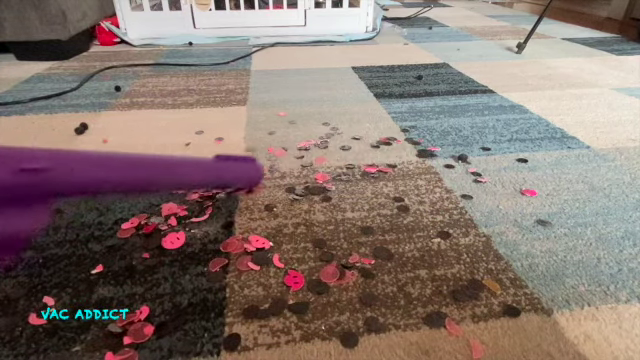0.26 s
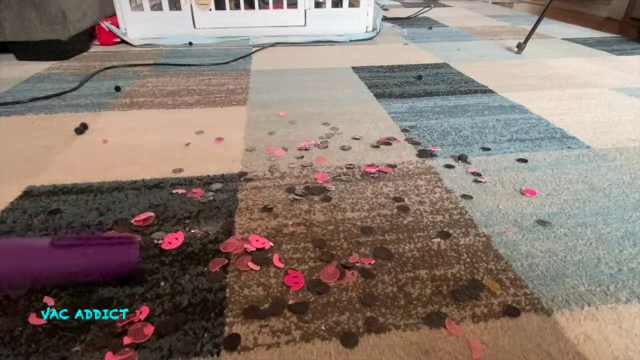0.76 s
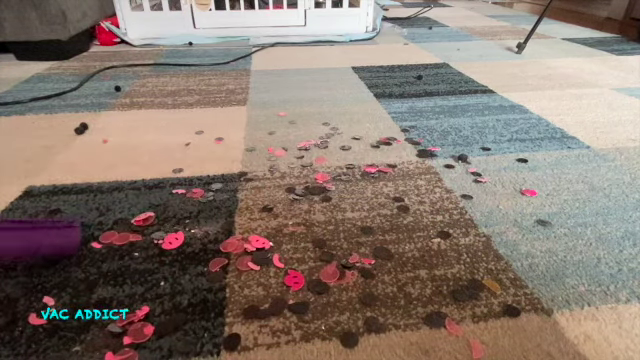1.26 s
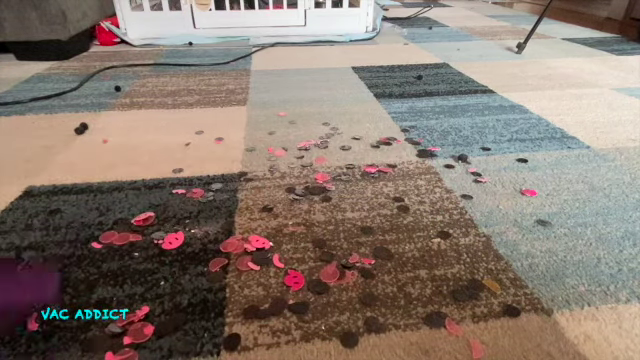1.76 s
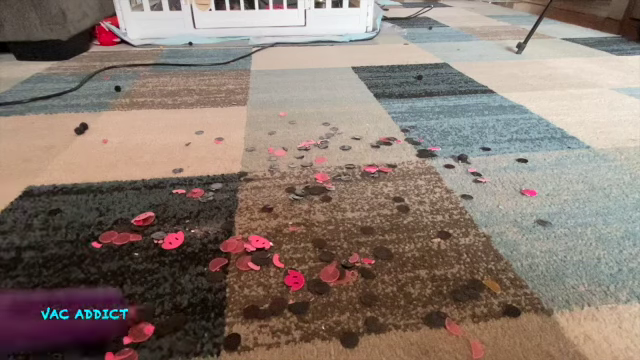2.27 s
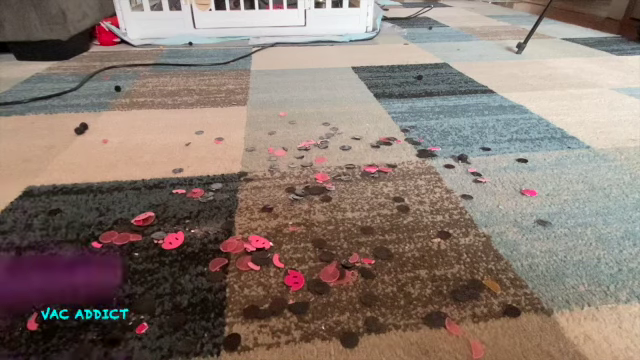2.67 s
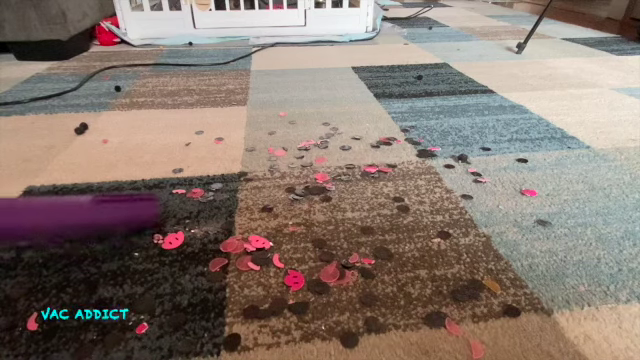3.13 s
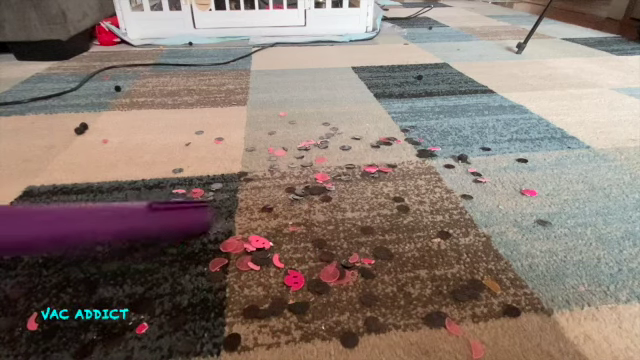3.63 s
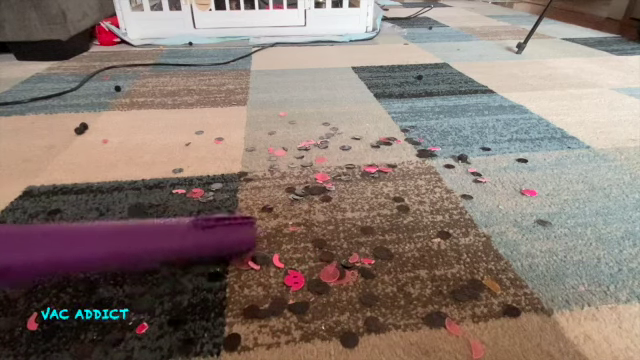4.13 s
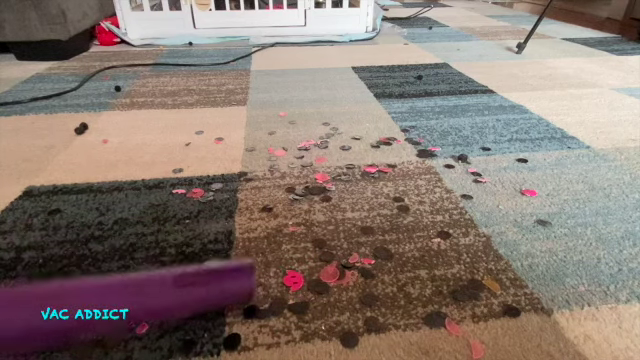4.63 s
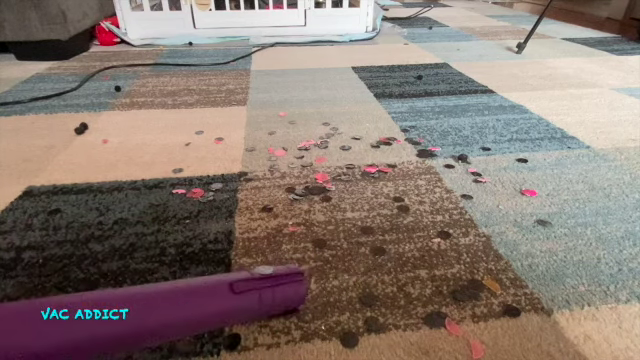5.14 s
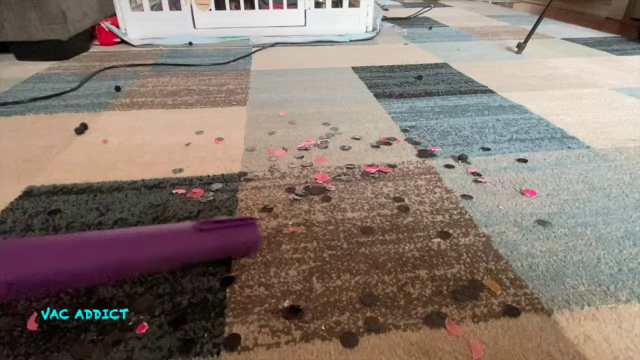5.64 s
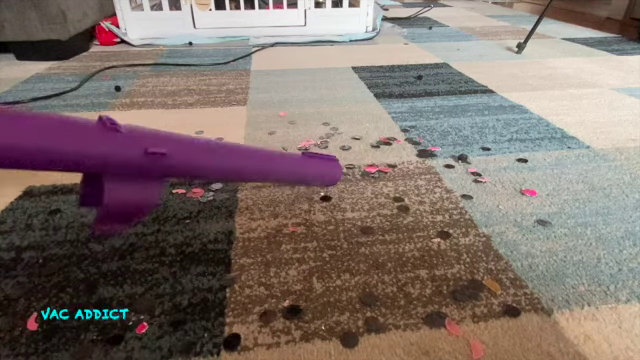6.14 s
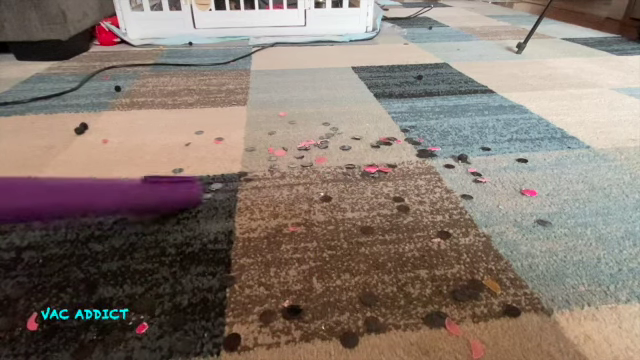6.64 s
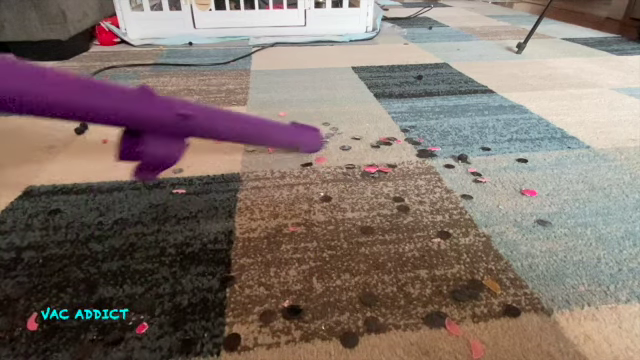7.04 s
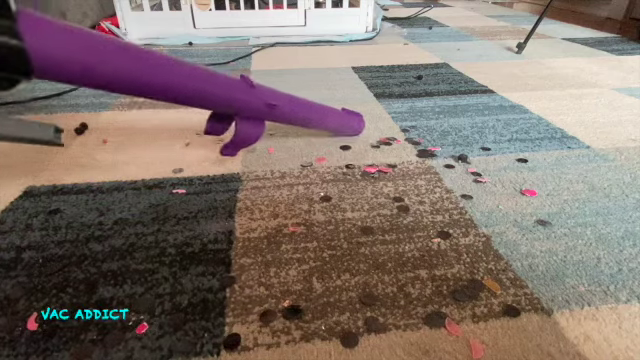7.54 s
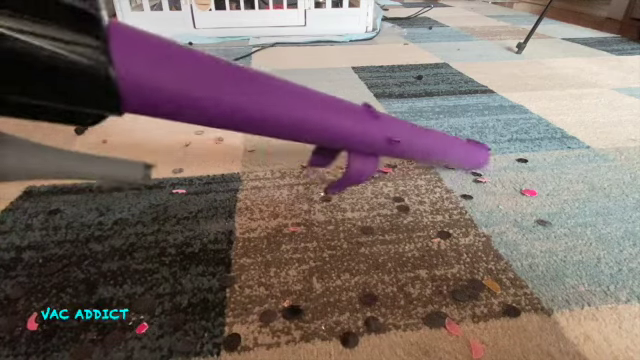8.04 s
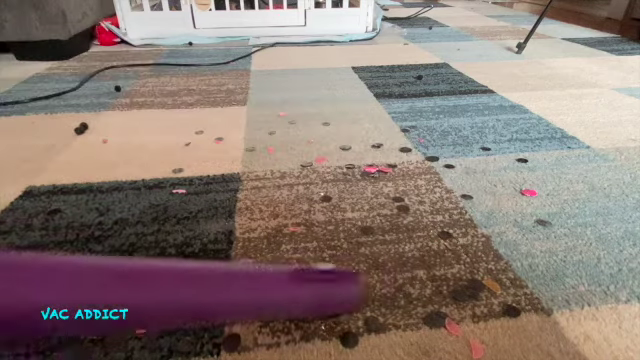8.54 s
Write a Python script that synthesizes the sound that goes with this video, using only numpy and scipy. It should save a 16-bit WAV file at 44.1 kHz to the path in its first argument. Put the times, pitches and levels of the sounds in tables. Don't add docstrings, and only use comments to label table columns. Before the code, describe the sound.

A vacuum cleaner whines and rushes steadily while small hard bits click and rattle up its plastic tube, with brief hisses and whistles at the nozzle.

```python
import sys
import numpy as np
from scipy import signal
from scipy.fft import rfft, irfft, next_fast_len
from scipy.io import wavfile
from scipy.ndimage import uniform_filter1d, map_coordinates

SR = 44100
rng = np.random.default_rng(int(sys.argv[2]) if len(sys.argv) > 2 else 0)


def voltage_ratio(level):
    return 10 ** (np.asarray(level, float) / 20)


def pcm_store(signal):
    levels = np.round(np.clip(np.atleast_2d(signal), -1, 1) * 32767)
    wavfile.write(sys.argv[1], SR, levels.astype(np.int16).T)


N = 388080
T = np.arange(N) / SR

# time in seconds, rotation rate in Hz, whine level in dB.
SHAFT_COURSE = [(0.0, 515, -29), (0.02, 511, -27.5), (1.39, 512.3, -27.5), (1.64, 513.7, -28),
                (3.55, 512.4, -25.5), (5.02, 515.3, -25.5), (5.86, 513.1, -24.5), (8.7, 513.6, -26),
                (8.8, 524, -24)]
# frequency in Hz, density in dB per Hz.
TUBE_SPECTRUM = [(500, 4.5), (1200, 0), (2400, 3), (3600, 1.5), (5200, 2.5), (6200, -3), (7600, 2.5),
                 (8600, -2), (12000, -9.5)]
# frequency in Hz, density in dB per Hz.
SLIT_SPECTRUM = [(6500, -30), (8000, -14), (8700, -13), (9400, -12), (10200, -6), (10900, 1), (11300, 1),
                 (11800, -4), (12500, -10)]


def unit(x):
    return x / np.sqrt(np.mean(x ** 2) + 1e-20)


def loudest(x):
    power = uniform_filter1d(x ** 2, size=44)
    return x / np.sqrt(np.abs(power).max(-1, keepdims=True))


def along(points, hz):
    f, v = np.transpose(points)
    return np.interp(np.log(hz + 1), np.log(f + 1), v)


def curves(rows):
    s, *columns = np.transpose(rows)
    return [np.interp(T, s, column) for column in columns]


def wobble(rate):
    t = T[::44]
    knots = rng.standard_normal(int(N * rate / SR) + 4)
    return np.interp(T, t, map_coordinates(knots, [t * rate]))


def swells(rows, rise_s, fall_s, rest_db):
    t = T[::44]
    level = np.full(len(t), float(rest_db))
    for s, hold, db in rows:
        end = s + abs(hold)
        share = np.interp(t, [s - abs(rise_s), s, end, end + abs(fall_s)], [0, 1, 1, 0])
        level = np.maximum(level, rest_db + share * (db - rest_db))
    return np.interp(T, t, level)


def filtered(x, response):
    m = next_fast_len(N + SR // 2)
    return irfft(rfft(x, m) * response(np.fft.rfftfreq(m, 1 / SR)), m)[..., :N]


def noise(spectrum, patchy_db):
    z = signal.stft(rng.standard_normal((2, N)), nperseg=512)[2]
    field = uniform_filter1d(rng.standard_normal(z.shape[1:]), 6, 0)
    field = uniform_filter1d(field, 10, 1)
    pair = signal.istft(z * voltage_ratio(patchy_db * unit(field)), nperseg=512)[1][:, :N]
    return unit(filtered(pair, lambda hz: voltage_ratio(along(spectrum, hz))))


def tones(turns, orders, flutter_db):
    out = np.zeros((2, N))
    for k, left_db, right_db, lead in orders:
        angle = 2 * np.pi * (k * turns + rng.random()) + np.array([[lead], [0]])
        level_db = np.array([[left_db], [right_db]]) + 2.5 + flutter_db * wobble(9)
        out += voltage_ratio(level_db) * np.sin(angle)
    return out


def motor():
    # multiple of the rotation rate, left level in dB, right level in dB, left lead in radians.
    shaft_orders = [(1, -22.5, -22, 1.9), (2, -46, -46, -3.1), (3, -53, -52, -2.7), (5, -52, -59, .8),
                    (6, -57, -58, 2.7), (9, -55, -59, -.4), (12, -51, -54, -2.8)]
    # multiple of twice the mains rate, left level in dB, right level in dB, left lead in radians.
    mains_orders = [(1, -45, -47, .2), (2, -35, -30, 1), (4, -42, -54, 1.1), (6, -42, -47, 2.4),
                    (7, -42, -44, 2.7), (8, -41, -43, 2.9), (9, -43, -45, 3), (10, -50, -63, 2.9),
                    (13, -58, -59, -1.6), (15, -53, -61, -2.3), (18, -59, -69, -.2)]
    hz, db = curves(SHAFT_COURSE)
    turns = np.cumsum(hz + 0.57 * wobble(14)) / SR
    whine = voltage_ratio(db - np.mean(db)) * tones(turns, shaft_orders, flutter_db=0.16)
    buzz_hz = 120.33
    return whine + tones(buzz_hz * T, mains_orders, flutter_db=1.0)


def air():
    # frequency in Hz, density in dB per Hz.
    rush_spectrum = [(25, -37), (70, -3.5), (130, -7.5), (330, -1), (620, 3), (800, 2.6), (1100, -0.1),
                     (1400, -8), (2400, -10), (4500, -12), (5600, -15.5), (7500, -21), (8600, -30),
                     (11000, -33)]
    drift_db = 0.4 * wobble(1.3) + 0.3 * wobble(8)
    rush = noise(rush_spectrum, patchy_db=1.8)
    near_db = curves(SHAFT_COURSE)[1]
    return voltage_ratio(-28.5 + drift_db + 0.51 * (near_db - near_db.mean())) * rush


def grit(rate, spread_db, t60):
    sizes = voltage_ratio(spread_db * np.minimum(rng.exponential(size=N), 2.2))
    knocks = (rng.random(N) < rate / SR) * sizes
    return unit(signal.fftconvolve(knocks, voltage_ratio(-60 * T[:SR // 20] / t60))[:N])


def edge_tone():
    # time in seconds, pitch in Hz.
    glide = [(0.1, 10900), (2.33, 10920), (2.48, 11500), (3.0, 10300), (3.05, 10300), (3.09, 10860),
             (3.97, 10700), (4.07, 11200), (4.23, 11200), (4.33, 11200), (4.83, 10650), (4.91, 11180),
             (5.94, 10660), (6.05, 10900), (6.94, 11000), (7.0, 10600), (7.66, 10900), (7.76, 11000)]
    width_hz, stutter_db = 330, 11
    angle = 2 * np.pi * np.cumsum(curves(glide)[0]) / SR
    pair = []
    for _ in range(2):
        pair.append(wobble(width_hz) * np.cos(angle) + wobble(width_hz) * np.sin(angle))
    return unit(voltage_ratio(stutter_db * wobble(70)) * np.array(pair))


def nozzle():
    # frequency in Hz, density in dB per Hz.
    drag_spectrum = [(25, -55), (60, -3.5), (82, -5.5), (100, 2.5), (125, -4), (160, -6.5), (190, 0),
                     (260, -9.5), (330, -5), (600, -7), (900, -34.5)]
    # start in seconds, hold in seconds, rumble level in dB.
    strokes = [(.12, 0.09, -28.5), (.39, 0.52, -28), (1.2, 0.14, -33.5), (2.33, 0.22, -25.5),
               (3.08, 0.26, -28.5), (3.61, .05, -29), (3.97, 0.26, -29), (4.33, 0.2, -28.5),
               (4.83, 0.21, -26), (5.0, 0.27, -31), (5.9, 0.24, -28.5), (6.6, .5, -31.5),
               (7.75, 0.082, -31.5), (8.6, 0.24, -31)]
    # start in seconds, hold in seconds, rattle level in dB, slit hiss level in dB.
    gulps = [(0.02, 0.089, -29, -40), (0.22, 0.026, -20, -34), (0.28, 0.5, -30, -41.5),
             (0.738, .01, -29, -45), (.8, 0.076, -32, -57), (1.088, 0.011, -40, -46),
             (1.17, 0.0086, -35, -46), (2.34, 0.067, -25.5, -34.5), (2.48, .01, -29, -49),
             (2.52, 0.065, -27, -55), (3.07, 0.064, -26, -41), (3.183, 0.0095, -23.5, -44),
             (3.333, 0.011, -26, -42), (3.978, 0.074, -25.5, -28.5), (4.223, 0.09, -27, -32.5),
             (4.395, 0.14, -29, -51), (4.5, 0.29, -34, -59), (4.843, 0.035, -29, -26),
             (4.933, 0.014, -24, -29), (5.048, 0.063, -28.5, -51), (5.947, 0.076, -25.5, -31),
             (6.115, 0.035, -25.5, -49), (6.667, 0.0099, -31, -38), (6.964, 0.025, -39, -33),
             (7.03, 0.011, -27, -40), (7.15, 0.0092, -30.5, -47), (7.68, 0.059, -32, -31),
             (7.874, 0.0092, -30, -56), (8.63, 0.039, -29, -48), (8.79, 0.022, -29, -53)]
    fall_s, empty_tube_db, open_slit_db = 0.06, -37.5, -54

    ragged_db = 1.5 * wobble(20)
    rattle_db = swells([g[:3] for g in gulps], 0.09, fall_s, empty_tube_db) + ragged_db
    slit_db = swells([g[:2] + g[3:] for g in gulps], 0.036, fall_s, open_slit_db) + ragged_db
    load = np.clip((rattle_db + 39) / 8, 0, 1)
    crumbs = load * grit(rate=600, spread_db=1.2, t60=0.006)

    drag_db = swells(strokes, rise_s=0.094, fall_s=0.083, rest_db=-37.5) + 2.0 + 0.71 * wobble(25)
    drag = voltage_ratio(drag_db) * noise(drag_spectrum, patchy_db=2.0)
    tube = (1 - 0.45 * load + 0.45 * crumbs) * noise(TUBE_SPECTRUM, patchy_db=3)
    slit = (1 - 0.3 * load + 0.45 * crumbs) * noise(SLIT_SPECTRUM, patchy_db=4.5)
    blocked = np.clip((slit_db - open_slit_db - 17.5) / 8, 0, 1)
    slit = (1 - 0.39 * blocked) * slit + blocked * voltage_ratio(-5) * edge_tone()
    return drag + voltage_ratio(rattle_db - 2.4) * tube + voltage_ratio(slit_db + 2.5) * slit


def pieces():
    # time in seconds, level in dB, ring in Hz, bright edge over the level in dB.
    snaps = [(0.1001, -11.5, 5000, -5), (0.1568, -11.5, 4910, -6), (0.1711, -18, 5510, -3),
             (0.1833, -20.5, 5250, -4), (0.2424, -8.5, 5000, -26), (0.6026, -23, 5080, -17),
             (0.6307, -18.5, 5250, -7), (0.6944, -13, 3790, -10), (0.7397, -7.5, 7300, -23),
             (0.9319, -24, 3700, -19), (1.0371, -21.5, 7670, -5), (1.091, -15, 4910, -10),
             (1.163, -9, 5450, -11), (1.2796, -20.0, 4130, -25), (1.335, -20, 3960, -32),
             (1.7715, -9.5, 5080, -21), (3.2778, -22, 4650, -18), (3.5903, -19.0, 4910, -17),
             (3.958, -19, 4480, -10), (4.0358, -9.5, 3270, -18), (4.0495, -7.5, 3360, -18),
             (4.3117, -15, 7490, -7), (4.3688, -12.5, 3100, -10), (4.4542, -5.5, 3450, -15),
             (4.5293, -24.0, 2000, -9), (4.8156, -17, 2410, -22), (4.8455, -14, 2930, 6),
             (4.88, -16, 5600, 2), (4.941, -4.5, 3530, -18), (4.9702, -19, 6550, -4),
             (5.926, -14, 8270, -15), (5.9398, -12.5, 4480, -2), (5.9936, -15, 4740, -27),
             (6.037, -5.5, 6980, -17), (6.112, -18, 3270, -22), (6.1792, -14, 2760, -33),
             (6.6718, -16, 5900, -19), (6.6767, -10, 6120, -9), (6.8247, -19, 3790, -12),
             (6.954, -12.0, 8270, -8), (6.968, -23, 2000, -1), (7.019, -7, 4570, -31),
             (7.2545, -22, 7750, 0), (7.678, -11.5, 5900, -11), (8.6318, -15.5, 7320, -12),
             (8.782, -9.5, 4310, -19)]
    cracks = [(0.0654, -18, 7060, -7), (0.0957, -10.5, 6700, -23), (0.217, -13, 5510, -5),
              (0.2993, -14, 5080, -16), (0.3862, -12.5, 5600, -18), (0.4255, -10, 2840, -23),
              (0.5275, -17, 5430, -16), (0.5817, -10, 5080, -14), (0.5884, -18.0, 4390, 3),
              (0.6367, -19, 4310, -5), (0.6874, -16, 3960, -14), (0.7302, -4, 4220, -23),
              (1.0222, -23, 6800, -2), (1.738, -22, 7410, -16), (2.3107, -17, 8270, -5),
              (2.428, -8.5, 3790, -8), (2.5164, -24, 5000, -21), (2.6011, -13, 3530, -26),
              (2.9994, -12, 8010, -13), (3.0371, -19.0, 6890, -17), (3.1254, -13.5, 3880, -21),
              (3.213, -19.5, 4820, -24), (3.352, -15, 3010, -28), (4.012, -14.5, 5340, -23),
              (4.195, -16, 3190, -14), (4.384, -19, 2670, -2), (4.4175, -21.5, 3960, -21),
              (4.5933, -17.5, 4050, -17), (4.7302, -16, 4570, -16), (4.801, -11, 5170, -25),
              (4.838, -15, 6550, 8), (4.8654, -13, 2000, 1), (4.9366, -14.0, 5000, -14),
              (5.021, -14, 4910, -19), (5.0367, -12.5, 3530, -18), (5.943, -18, 6980, -14),
              (5.96, -15, 3960, -2), (5.9717, -12, 5170, -10), (6.1061, -15, 4050, -26),
              (6.9198, -20, 5680, -9), (6.9454, -17.5, 7600, 6), (7.66, -20, 4740, 0),
              (7.7329, -11, 4910, -12), (7.8786, -14, 3620, -28), (8.2103, -23, 2000, -19),
              (8.6099, -17, 4130, -21)]
    knocks = [(0.0738, -19, 3620, -23), (0.114, -8.5, 4910, -27), (0.3228, -13, 6290, -15),
              (0.3283, -24, 5080, -3), (0.3795, -16.0, 4740, -21), (0.4954, -16, 5170, -32),
              (0.5113, -16, 8180, -5), (0.5363, -21, 3270, -10), (0.9079, -20.5, 4910, -27),
              (1.978, -20.5, 2930, -26), (2.2524, -18, 2930, -9), (2.4013, -14, 5340, -8),
              (2.4774, -20, 4050, 4), (2.5506, -12, 3100, -23), (3.0557, -15.5, 5860, -7),
              (3.0703, -12, 7410, -4), (3.098, -18, 8180, -2), (3.1743, -7.5, 3450, -16),
              (3.2252, -22, 4820, -18), (4.0643, -19, 5170, -8), (4.0684, -17.5, 5100, -22),
              (4.2384, -24, 3960, 10), (4.2483, -18, 7410, -19), (4.2878, -9, 2930, -4),
              (4.2965, -13, 4480, -5), (4.4692, -15.5, 3700, -18), (4.4728, -21.0, 2670, -28),
              (4.7442, -20.5, 4300, -6), (4.9083, -11.0, 3350, -14), (4.978, -18, 2670, -21),
              (5.079, -17, 4130, -21), (5.9026, -22, 4570, 0), (5.9146, -21, 2000, 0),
              (5.9639, -10, 4130, -16), (6.009, -10, 5250, -23), (6.0413, -17, 7750, -14),
              (6.9786, -21.5, 7920, -4), (7.1657, -20, 2000, -21), (7.266, -19.5, 7700, 1),
              (7.6501, -24, 5250, -18), (7.7282, -8, 3530, -23), (7.764, -23.5, 2000, -13),
              (7.7718, -21, 7200, -16), (7.8651, -15, 3190, -19), (8.5995, -21, 7840, -5),
              (8.684, -15.0, 4310, -28)]
    skids = [(0.038, -23.5, 6370, -13), (0.3322, -24.0, 3010, -14), (0.3906, -21, 4390, -13),
             (0.6605, -18, 5430, -7), (0.6645, -18, 4820, -8), (0.9184, -17, 3530, -27),
             (1.699, -22, 5600, -22), (1.962, -23, 3270, -19), (2.3243, -21, 4570, -4),
             (2.3412, -19.5, 5510, -24), (2.365, -12, 7750, -4), (2.4724, -18, 4820, -12),
             (2.4827, -21, 3700, -9), (2.605, -28, 4820, -19), (2.9862, -20.5, 4310, -20),
             (3.1077, -25, 4480, -22), (3.1354, -23.0, 7410, -7), (3.1654, -17, 7490, -13),
             (3.183, -18, 4390, -25), (3.6502, -26, 3790, -5), (3.9376, -25, 3960, -2),
             (3.947, -24, 4390, -2), (4.1725, -22.0, 2000, -22), (4.201, -17.5, 3700, -22),
             (4.2194, -17, 5130, -20), (4.2267, -19.5, 8270, -15), (4.397, -18.5, 4390, -32),
             (4.496, -26.0, 5170, -10), (4.9058, -14, 2930, -19), (5.0266, -15, 3960, -11),
             (5.9005, -24, 2000, 0), (5.9769, -19, 4390, -2), (6.014, -21, 3360, 3),
             (6.0896, -24, 5340, -9), (6.1191, -18, 5430, -24), (6.1371, -19, 4910, -13),
             (6.1453, -19, 2670, -28), (7.0266, -18, 8100, -17), (7.2296, -21.0, 2000, -31),
             (7.3293, -21, 4700, -19), (7.7033, -22.5, 5680, -11), (8.6496, -22, 5170, -11),
             (8.679, -18, 4220, -20), (8.7756, -21.5, 2000, -23)]
    # time in seconds, level in dB, ring in Hz, bright edge over
    # the level in dB.
    strays = [(.019, -25, 7000, -1), (.0255, -12, 6460, -6), (0.431, -17, 2600, -10), (2.379, -24, 2400, 6),
              (2.4197, -18, 4500, -8), (3.018, -27, 7000, 3), (4.858, -23, 3000, -4),
              (5.8855, -26, 7500, 3), (6.617, -20, 5000, -7), (8.789, -18, 4500, -11)]
    strike_t60 = [0.0045, .012, 0.024, 0.04, .012]
    strike_db = [-3.5, -5.5, -7, -6, -4]
    ring_width_hz, tail_t60, tail_share = 1150, 0.12, 0.16

    size = 2048
    t, f = T[:size], np.fft.rfftfreq(size, 1 / SR)
    out = np.zeros((2, N + size))
    for rows, t60, kind_db in zip((snaps, cracks, knocks, skids, strays), strike_t60, strike_db):
        decay = voltage_ratio(-60 * t / t60) + tail_share * voltage_ratio(-60 * t / tail_t60)
        shape = (1 - np.exp(-t / 0.0001)) * decay
        for s, db, hz, edge_db in rows:
            blow = rfft(shape * rng.standard_normal((2, size)))
            ring = 1j * f * ring_width_hz / (hz * hz - f * f + 1j * f * ring_width_hz)
            wall = ring + 0.83 * voltage_ratio(along(TUBE_SPECTRUM, f))
            body = loudest(irfft(blow * wall / (1 + (f / 11000) ** 6)))
            edge = loudest(irfft(blow * voltage_ratio(along(SLIT_SPECTRUM, f))))
            strike = voltage_ratio(db + kind_db) * (body + voltage_ratio(edge_db + 2.5) * edge)
            out[:, round(s * SR):][:, :size] += strike
    return out[:, :N]


def ports(pair):
    # frequency in Hz, likeness of the ports from 0 to 1.
    likeness = [(60, .96), (150, .9), (330, .62), (620, .5), (1100, .64), (1450, .66), (1800, .42),
                (2400, .5), (3250, .68), (4200, .45), (6000, .52), (7900, .45), (8600, .4), (9200, .85),
                (9900, .5), (10700, .88)]
    # frequency in Hz, left over right in dB.
    left_excess = [(100, 0), (330, 2.5), (1100, 1.5), (1800, 4), (2400, 3), (4000, 5.5), (7000, 4.5),
                   (8600, 1.5), (9300, 0)]
    # frequency in Hz, left lead in radians.
    left_lead = [(0, 0), (150, .1), (500, 1.9), (900, 3), (1380, 3.2), (2400, 6.5), (3300, 9.3),
                 (5700, 15.6), (6150, 15.8), (6500, 18.9), (7300, 19), (7700, 22), (9600, 22),
                 (10500, 18.85)]
    m = next_fast_len(N + SR // 2)
    hz, side = np.fft.rfftfreq(m, 1 / SR), np.array([[1], [-1]])
    direct, scattered = rfft(pair, m)
    spread = np.arccos(np.clip(along(likeness, hz), 0, 1)) / 2
    phase = np.interp(hz, *np.transpose(left_lead))
    near = voltage_ratio(side * along(left_excess, hz) / 2) * np.exp(0.5j * side * phase)
    return irfft(near * (np.cos(spread) * direct + side * np.sin(spread) * scattered), m)[:, :N]


def scene():
    return motor() + ports(air() + nozzle() + pieces())


def top_cut(x):
    return signal.sosfilt(signal.butter(12, 12780, fs=SR, output="sos"), x)


def record(dry):
    # frequency in Hz, gain in dB.
    treble_fall = [(11200, 0.5), (11600, -6.5), (12000, -22), (12400, -36), (13000, -60)]
    held = dry / (1 + np.abs(dry / 0.92) ** 6) ** (1 / 6)
    mix = filtered(held, lambda hz: voltage_ratio(along(treble_fall, hz)))
    return top_cut(mix)


dry = scene()
out = record(dry)
pcm_store(out)
```